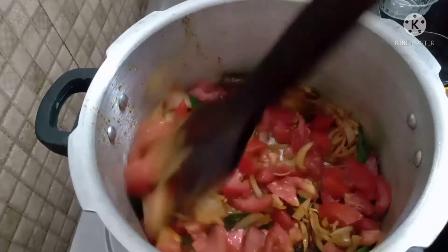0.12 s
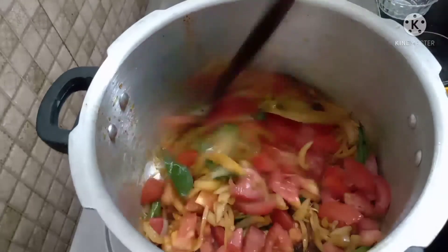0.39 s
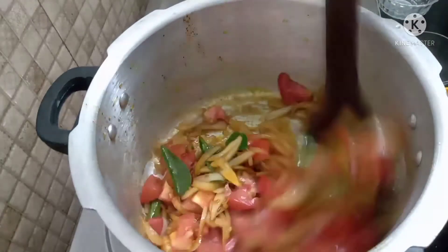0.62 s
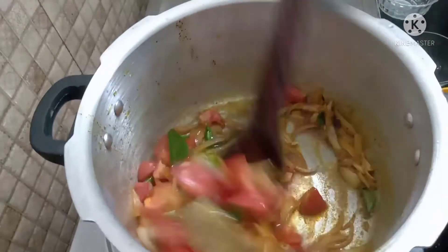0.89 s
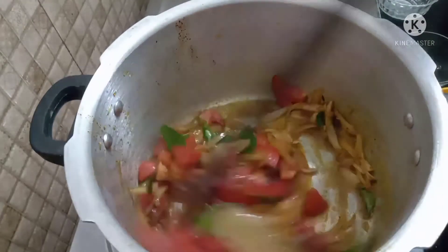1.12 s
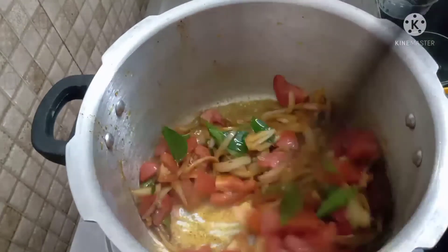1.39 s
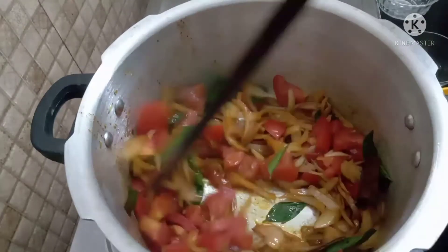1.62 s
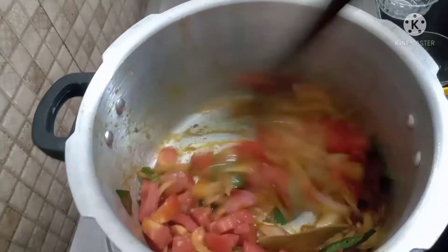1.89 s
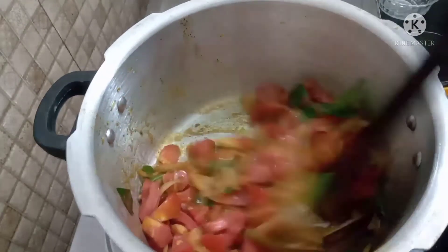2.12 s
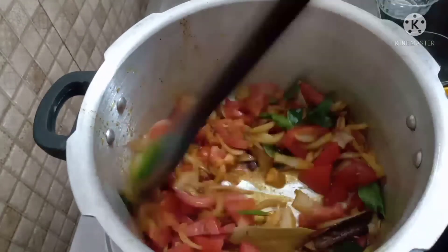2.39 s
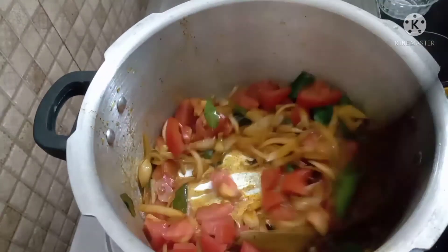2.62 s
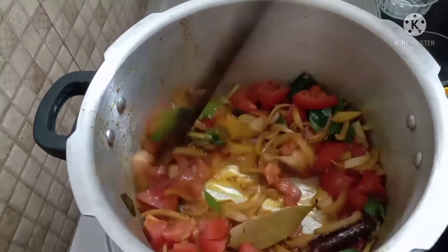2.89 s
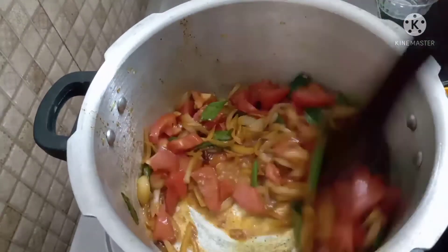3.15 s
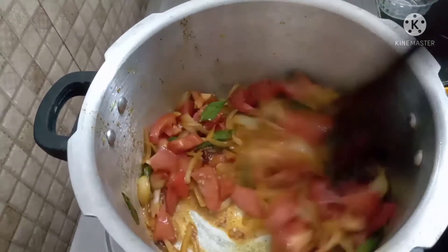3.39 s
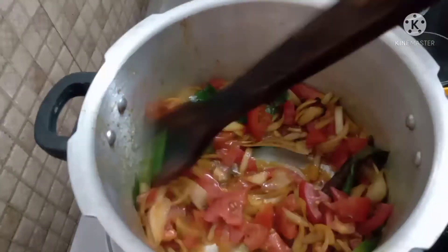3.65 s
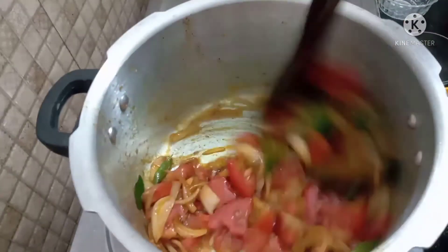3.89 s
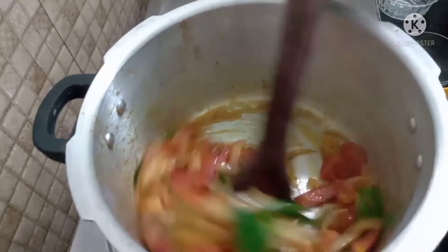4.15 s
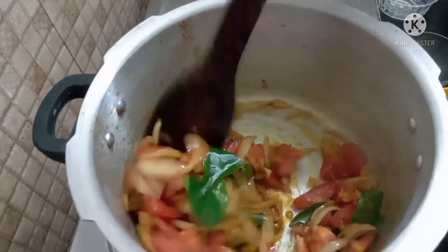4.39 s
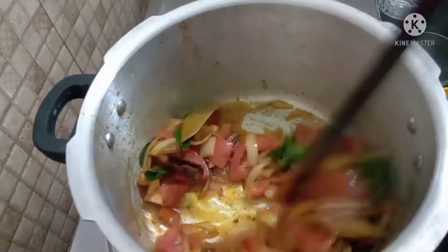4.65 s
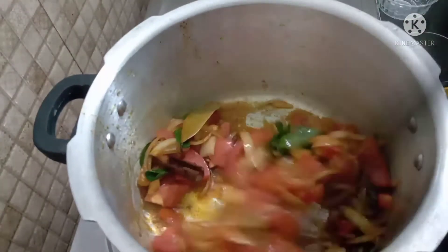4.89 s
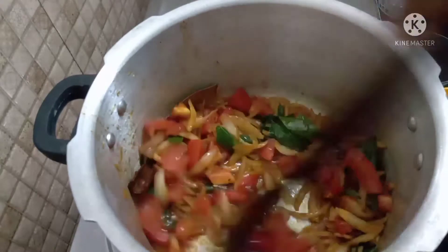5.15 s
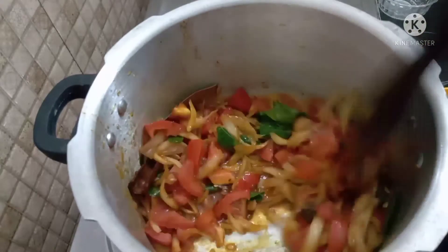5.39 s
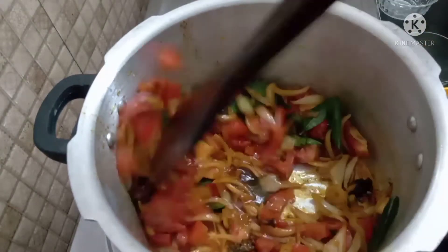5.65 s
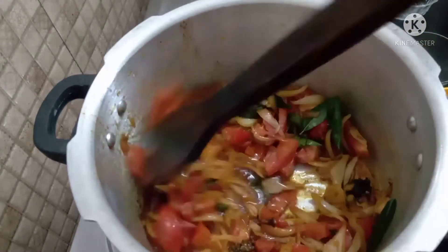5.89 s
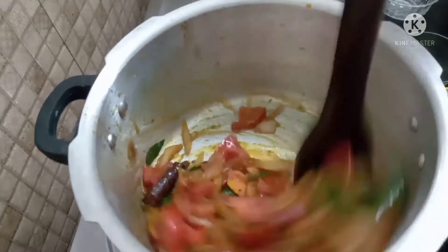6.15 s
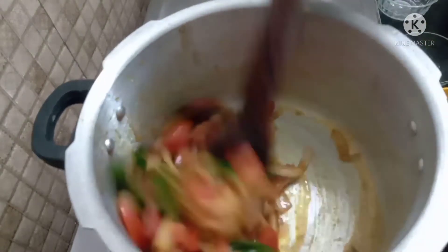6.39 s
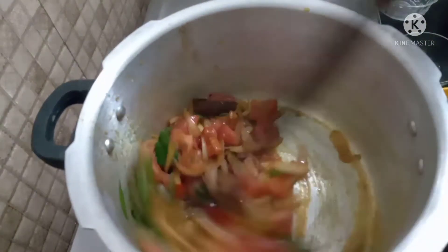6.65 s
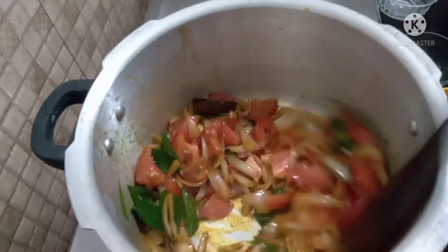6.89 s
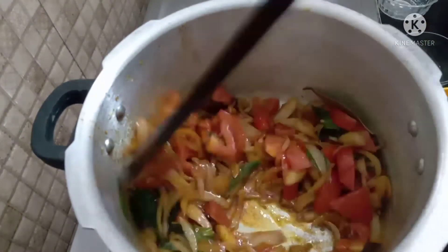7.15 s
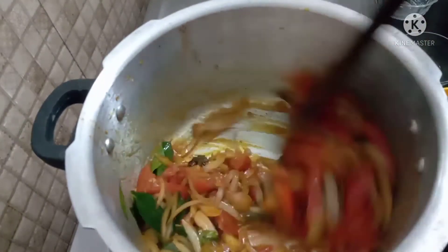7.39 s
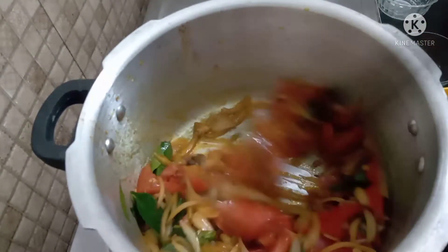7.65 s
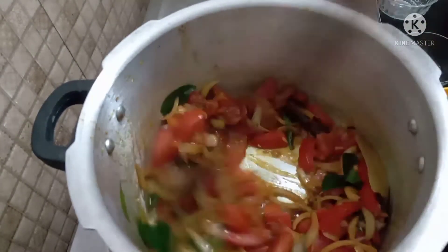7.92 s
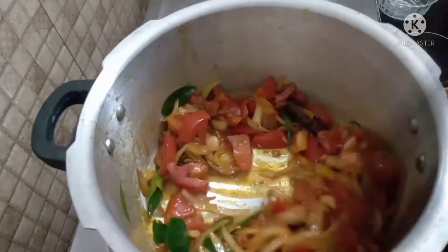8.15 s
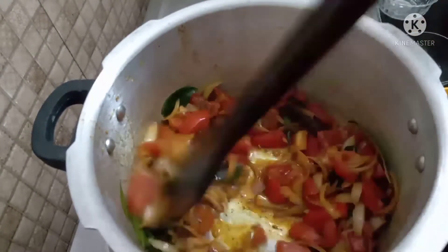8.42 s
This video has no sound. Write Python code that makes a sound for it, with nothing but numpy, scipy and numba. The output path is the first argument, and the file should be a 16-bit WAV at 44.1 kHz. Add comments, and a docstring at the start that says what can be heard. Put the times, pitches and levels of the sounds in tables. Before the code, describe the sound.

Chopped vegetables sizzle steadily in oil in a deep metal pot while a wooden spatula scrapes the base and knocks the wall.

```python
"""Vegetables frying in a deep pot

Chopped vegetables fry in oil in a deep metal pot, heard from above by a phone with one microphone.
Bursting steam is dense random impulses, coloured in bands; larger bubbles are short tones of rising pitch.
A wooden spatula scrapes the base and knocks the wall: noise and short pushes drive close, damped modes.
The phone's gain control ducks at each hard knock and creeps back over about a second.
"""
import sys
import numpy as np
from scipy import signal
from scipy.fft import rfft, irfft, next_fast_len
from scipy.io import wavfile
from scipy.ndimage import uniform_filter1d
from numba import njit

SR = 44100
rng = np.random.default_rng(int(sys.argv[2]) if len(sys.argv) > 2 else 0)


def log_audio(samples):
    """Write samples as a 16-bit WAV file to the path given in sys.argv[1]."""
    # one column per channel
    frames = np.atleast_2d(samples).T
    # limit to full scale, then quantise
    limited = np.clip(frames, -1, 1)
    pcm = np.round(limited * 32767).astype(np.int16)
    wavfile.write(sys.argv[1], SR, pcm)


def invert_db(x):
    """Field ratio 10**(x/20) for x, a level in decibels (scalar or array-like)."""
    u = np.asarray(x, float) / 20
    return 10 ** u


N = 376173  # length [samples]
BIGGEST = 5.0  # cap on the e-folds of rarity that a burst or bubble can reach


def unit(x):
    """Power normalisation: scale to rms 1."""
    return x / np.sqrt(np.mean(x ** 2))


def walk(rate):
    """Slow random modulation: levels held for 1 / rate seconds and slewed twice; rms 1."""
    held = int(SR / rate)
    steps = np.repeat(rng.standard_normal(N // held + 1), held)
    slewed = uniform_filter1d(uniform_filter1d(steps, held), held)
    return unit(slewed[:N])


def bells(rows, rest_db):
    """Gaussian envelopes: level in dB of events that swell and fade over a resting level."""
    t = np.arange(N) / SR
    swells = sum(invert_db(db) * np.exp(-((t - middle) / half) ** 2) for middle, half, db in rows)
    return 20 * np.log10(invert_db(rest_db) + swells)


def highpass(x, order, hz):
    """Butterworth filtering: remove what lies below hz."""
    return signal.sosfilt(signal.butter(order, hz, "high", fs=SR, output="sos"), x)


def colour(x, points, flicker_db, rate, count):
    """Spectral shaping: overlapping bands follow a curve, each flickering on its own."""
    hz, db = np.transpose(points)
    size = next_fast_len(N)
    pitch = np.log(np.arange(size // 2 + 1) * SR / size + 1)
    shaped = rfft(x, size) * invert_db(np.interp(pitch, np.log(hz), db, left=-90, right=-90))
    place = np.interp(pitch, np.log([hz[0], hz[-1]]), [0, count - 1])
    out = 0
    for k in range(count):
        band = irfft(shaped * np.clip(1 - abs(place - k), 0, 1), size)[:N]
        out = out + band * invert_db(flicker_db * walk(rate))
    return unit(out)


def crackle(scatter_db, throb_db, throb_rate):
    """Random impulse process: bursts so dense that they merge; sizes are uneven and come in throbs."""
    rarity = np.minimum(rng.exponential(size=N), BIGGEST)
    return rng.standard_normal(N) * invert_db(scatter_db * rarity + throb_db * walk(throb_rate))


def ring(push, modes):
    """Modal resonance: a force drives damped modes, one complex pole each."""
    out = 0
    for hz, db, t60 in modes:
        pole = np.exp((2j * np.pi * hz - np.log(1000) / t60) / SR)
        out = out + invert_db(db) * signal.lfilter([1], [1, -pole], push).imag
    return out


def decays(modes, after):
    """Free vibration: one exponentially fading sine per mode."""
    hz, db, t60 = np.transpose(modes)[:, :, None]
    return invert_db(db) * np.sin(2 * np.pi * hz * after) * invert_db(-60 * after / t60)


@njit
def grains(n, start, step, cycles, glide, size):
    """Bubble resonance: short damped tones whose pitch rises."""
    out = np.zeros(n)
    for k in range(len(start)):
        length = int(cycles[k] * 2 * np.pi / step[k])
        phase = 0.
        for i in range(min(3 * length, n - start[k])):
            phase += step[k] * (1 + glide * i / length)
            out[start[k] + i] += size[k] * np.sin(phase) * (i / length) * np.exp(-2 * i / length)
    return out


# level of the frying over time, as fine fizz and coarse sizzle swell and sink:
# (time [s], fine fizz [dB], coarse sizzle [dB])
FRY_LEVELS = [(0.0, -17.5, -21.5), (0.25, -18, -19.5), (0.6, -17, -21), (0.95, -18.5, -21),
              (1.3, -16.5, -20.5), (1.55, -22.5, -20.5), (1.95, -18.5, -22), (2.15, -19.5, -19),
              (2.58, -18.5, -20.5), (2.75, -22.5, -21), (3.15, -21.5, -22.5), (3.55, -22.5, -21),
              (3.75, -18, -23.5), (4.15, -19, -21.5), (4.43, -21.5, -21), (4.6, -20.5, -21),
              (4.75, -19.5, -21), (4.9, -19, -18), (5.35, -21, -18), (6.0, -17.5, -21),
              (6.75, -19.5, -19.5), (7.0, -22, -20.5), (7.35, -21.5, -23), (7.75, -21, -21.5),
              (8.02, -24, -22), (8.25, -19.5, -19.5), (8.53, -19.5, -19)]


def frying_levels():
    """Piecewise-linear envelopes: fizz and sizzle levels in dB, interpolated over time."""
    s, *columns = np.transpose(FRY_LEVELS)
    return [np.interp(np.arange(N) / SR, s, column) for column in columns]


def bubbles(count, low_hz, high_hz):
    """Bubble resonance: larger bubbles of tomato juice boiling in the oil."""
    when, pitch, life, size = rng.random((count, 4)).T
    start = (when * (N - 1)).astype(np.int64)
    hz = low_hz * (high_hz / low_hz) ** pitch
    cycles = 4 + 43.6 * life ** 3
    gain = invert_db(-2.0 * np.log(size + np.exp(-BIGGEST)))  # the rarer, the louder
    return unit(grains(N, start, 2 * np.pi * hz / SR, cycles, 0.035, gain))


# colour of the frying, below and on top: (frequency [Hz], relative density [dB per Hz])
COARSE_COLOUR = [(60, -52), (200, -36), (420, -6), (520, 0.5), (760, -3.5), (1100, -4), (1500, -2),
                 (2550, 3), (3900, 2), (5600, 2.5), (6600, 1.5), (7400, -5.5), (9000, -9)]
FINE_COLOUR = [(3500, -49), (5500, 0), (6600, 3), (7900, -4.5), (10000, 4.5), (12000, -1.5), (13700, -7.5),
               (14500, 4), (15500, 7), (15700, -18)]


def frying(fine_db, coarse_db):
    """Superposed steam bursts: fine fizz on top, coarse sizzle with bubbles below."""
    fine = colour(crackle(1.5, 1.0, 65.), FINE_COLOUR, flicker_db=0.75, rate=30., count=6)
    coarse = colour(crackle(2.7, 0.77, 45.), COARSE_COLOUR, flicker_db=0.79, rate=24., count=12)
    coarse = coarse + invert_db(-11.0) * bubbles(count=6000, low_hz=1674.0, high_hz=7335.0)
    return invert_db(fine_db) * fine + invert_db(coarse_db) * coarse


# swarms of like-sized bubbles where wet pieces land on bare metal:
# (middle [s], half length [s], centre frequency [Hz], relative level [dB])
SWARMS = [(.55, 0.086, 5500, -30), (1.32, 0.035, 5460, -26), (2.47, 0.046, 2970, -29),
          (2.57, 0.051, 5200, -22), (3.3, 0.12, 2520, -35), (5.49, 0.071, 2820, -28),
          (5.62, 0.057, 2800, -43), (5.78, 0.07, 2790, -26), (6.3, 0.082, 2950, -41),
          (7.19, .05, 3000, -28.5), (7.9, 0.13, 2990, -32), (8.49, 0.044, 2400, -32)]


def swarms(count):
    """Bubble resonance: like sizes share nearly one pitch, crowding round each swarm's middle."""
    middle, half, hz, db = np.repeat(SWARMS, count, axis=0).T
    when, pitch, size = rng.standard_normal((len(middle), 3)).T
    start = np.clip((middle + 0.84 * half * when) * SR, 0, N - 1).astype(np.int64)
    step = 2 * np.pi * hz * np.exp(0.17 * pitch) / SR
    # long swarms are sparser, so each bubble is stronger
    gain = invert_db(db + 11.0 + 3.6 * size) * np.sqrt(half / 0.043)
    return grains(N, start, step, np.full(len(middle), 14.0), 0.028, gain)


# air resonances in the pot: (frequency [Hz], relative drive [dB], t60 [s])
AIR_MODES = [(520, -1.5, 0.0096), (1120, 4.5, 0.11), (1188, 6.5, 0.061), (1231, 2.5, 0.075),
             (1316, 8, 0.023)]


def hum(coarse_db):
    """Cavity resonance: crackle drives the air in the deep pot, louder as the sizzle grows."""
    air = np.gradient(ring(crackle(1.5, 1.5, 18.), AIR_MODES))
    # -34.5 dB at a sizzle of -21 dB, and 1.5 dB more per dB of sizzle
    level_db = -34.5 + 1.5 * (coarse_db + 21)
    return unit(air) * invert_db(level_db - walk(2.05))


# brief dips of the sizzle: (middle [s], depth [dB])
DIPS = [(0.946, 4), (1.172, 2.5), (1.70, 3.5), (2.035, 7.5), (5.57, 4), (5.70, 2.5)]


def dip_gain():
    """Amplitude modulation: bell-shaped dips in dB, as a gain."""
    t = np.arange(N) / SR
    return invert_db(-sum(db * np.exp(-((t - middle) / 0.011) ** 2) for middle, db in DIPS))


LIFT_S = 0.035  # the blade damps the long ring until it leaves the wall


def jostling(count):
    """Variable damping: sliding food grips and frees the wall, roughening and lowering its ring."""
    after = np.arange(SR) / SR
    share, held = 0.7, int(0.009 * SR)
    rough = np.repeat(rng.standard_normal((count, SR // held + 1)), held, axis=1)[:, :SR]
    rough = uniform_filter1d(rough, held, axis=1) * (1 - np.exp(-after / LIFT_S))
    return (1 + share / (1 - share) * rough) / (1 + np.minimum(after / LIFT_S, 1))


# spatula blows: (time [s], body [dB], low wall [dB], upper wall [dB], bright ring [dB], long ring [dB]),
# the last four relative to the body
KNOCKS = [(0.1167, -28.5, -46, -5, 4, -18), (0.961, -27.5, -1.5, 2, 8.5, -7),
          (1.3746, 3, -31, -11, -6, -16), (1.6973, -47.5, 14.5, -14, 6, -4),
          (2.0466, 3.5, -40, -13, -1, -14.5), (2.409, -34, -1, -5, 1, -2), (2.6395, 0.5, -26, -19, -9, -20),
          (2.895, -22, -30, -24, -10, -14), (3.4989, -31, -22, -6, 16, -3), (4.3797, -26, -17, -4, 3, -6),
          (4.442, 6.5, -32, -30, -9, -16), (4.7086, -30, -1, 6.5, 11, -2),
          (4.7791, -2.5, -31, -11, -3.5, -9.5), (4.993, -27.5, -27, -3, 12, -17),
          (5.0883, -10, -23, -12, 3, -11), (5.3415, -23, -5, -15, 1, -24), (5.6745, -32, -34, 2.5, 6, -1),
          (6.553, -20, -27, -22, -6, -12), (6.813, -22.5, -36, 6, 10.5, -11),
          (6.8589, 8.5, -27, -14.5, -8, -26), (7.071, -26.5, -17, -20, 4.5, -4),
          (7.4276, -33.5, 3, 4, 14, -2), (7.573, -38.5, -3, 14.5, -1, -12),
          (7.7176, -30, -6, -22, -26, -12), (8.1102, -38, -22, 3, 9, -8), (8.172, -44, 14, 4, 2, -8),
          (8.1955, -1, -19.5, -22, -22, -17.5)]
# pot modes, in the order of those levels: (frequency [Hz], relative level [dB], free t60 [s])
BODY = [(688, 0, .034), (880, -9, .022)]
WALL_LOW = [(254.8, 0.5, 0.5), (218, -7, 0.066), (310, -4.5, 0.046)]
WALL = [(322.9, 3, 0.42), (349.8, 1.5, 0.27), (356.3, -13.5, 0.43), (397, -9, 0.36), (452, -5, 0.31)]
BRIGHT = [(965, 13, 0.014), (1404, 7.5, 0.1), (1042, 1.5, 0.17), (1114, -4, 0.23), (1144, -6, 0.068),
          (1170, -13, 0.37), (1380, -16, 0.35)]
RING = [(506, -12, 0.3), (544, -8, 0.4), (575, -9, .4), (630, -5, 0.35), (667, -5, .3), (690, -2, 0.36),
        (725, -5, 0.3), (789, -4, 0.25), (861, -7, 0.25), (926, -10, 0.25), (975, -11, .22)]


def knocks():
    """Impact excitation of modes: hard blows are one short push; light ones glance off and rattle."""
    s, body_db, *shares = np.transpose(KNOCKS)
    after = np.arange(SR) / SR
    push = -np.hanning(int(0.001 * SR) + 2)
    rattle_s = np.arange(1300) / SR
    rattles = rng.standard_normal((len(s), len(rattle_s))) * np.exp(-rattle_s / 0.0074) * invert_db(-15.5)
    rattles[body_db > -12] *= invert_db(-22)  # hard blows hardly rattle
    rattles[:, 0] = 1
    blows = 0
    for modes, share_db in zip((BODY, WALL_LOW, WALL, BRIGHT, RING), (0, *shares)):
        # sound follows the speed of the wall, not its deflection
        deflection = signal.fftconvolve(decays(modes, after), [push])[:, :SR]
        speed = np.gradient(deflection, axis=1)
        if modes is RING:
            speed = speed * (1 - np.exp(-(after / LIFT_S) ** 2))
        # each blow lands elsewhere and weights the modes anew, by 2.5 dB, except in the body
        spot = invert_db((modes is not BODY) * 2.5 * rng.standard_normal((len(s), len(modes))))
        weights = invert_db(body_db + share_db)[:, None] * spot
        part = weights @ speed / np.abs(speed.sum(axis=0)).max()
        if modes in (RING, BRIGHT, WALL):
            part = part * jostling(len(s))
        blows = blows + part
    out = np.zeros(N + 2 * SR)
    for start, blow in zip((s * SR).astype(int), signal.fftconvolve(blows, rattles, axes=1)):
        out[start:start + len(blow)] += blow
    # the pot is small against long waves and radiates little bass
    return highpass(out[:N], 6, 225.)


# dry ticks of the blade edge on the metal: (time [s], level [dB], tilt [dB per octave])
TICKS = [(1.626, -20, 0), (3.5, -12, 2), (3.506, -22.5, 5), (3.555, -23, 4), (4.709, -12.5, 0),
         (5.0896, -28, 7), (5.343, -25, 4), (5.664, -24, 1), (5.675, -11, -5), (7.071, -16, 2),
         (7.7184, -20, 10), (8.1097, -14, 6)]
# modes of the wooden blade: (frequency [Hz], relative level [dB], t60 [s])
BLADE = [(560, -9, .02), (1000, 0, .014), (1400, -2, .014), (1750, -2, .02), (2350, -4, .014),
         (2850, -2, .02), (3700, -6, .018)]


def ticks():
    """Impact excitation: short blade modes, tilted by the angle of contact, skidding for a moment."""
    out, after = np.zeros(N), np.arange(3000) / SR
    blade = decays(BLADE, after)
    octaves = np.log2(np.transpose(BLADE)[0] / 1500)
    skids = rng.standard_normal((len(TICKS), len(after))) * np.exp(-after / 0.004) * invert_db(-22.5)
    skids[:, 0] = 1
    for (s, db, tilt_db), skid in zip(TICKS, skids):
        tick = np.convolve(invert_db(db + tilt_db * octaves) @ blade, skid)[:len(after)]
        out[int(s * SR):int(s * SR) + len(after)] += tick
    return highpass(out, 4, 400.)


# scraping strokes of the blade over the base: (middle [s], half length [s], drive [dB])
STROKES = [(0.44, 0.2, -46.5), (0.97, 0.13, -42), (1.605, 0.17, -41), (2.12, 0.062, -26),
           (2.36, 0.096, -32), (2.88, 0.067, -39), (3.677, 0.085, -39.5), (4.0, 0.036, -43),
           (4.49, 0.036, -33.5), (4.953, 0.25, -38.5), (5.47, 0.13, -35), (6.096, 0.43, -45.5),
           (6.62, 0.062, -47), (7.054, 0.24, -37.5), (7.57, 0.14, -44.5), (7.877, 0.13, -42),
           (8.238, 0.047, -29), (8.5, 0.099, -36)]


def drag():
    """Friction excitation: the blade chatters over the base and shakes the pot modes."""
    drive = invert_db(bells(STROKES, rest_db=-52.5))  # the blade still stirs between strokes
    chatter = crackle(2.0, 2.8, 30.)
    wall, body = (ring(chatter * drive, modes) / np.std(ring(chatter[:SR], modes))
                  for modes in ([*WALL_LOW, *WALL], [*BODY, *RING]))
    return highpass(wall + invert_db(1.5) * body, 6, 220.)


# bright snaps of the blade tip and of drops bursting in the oil:
# (time [s], level [dB], frequency [Hz], fade to 1/e [s])
POPS = [(3.525, -16, 1900, 0.0066), (3.549, -19, 2500, 0.017), (3.598, -18, 3200, .012),
        (4.999, -17, 1700, 0.0091), (5.548, -8, 6040, 0.003)]


def pops():
    """Transient noise: a crack in a band around the snap's pitch, fading exponentially."""
    out, after = np.zeros(N), np.arange(1500) / SR
    for s, db, hz, fade in POPS:
        band = signal.butter(2, [0.83 * hz, 1.4 * hz], "band", fs=SR)
        crack = unit(signal.lfilter(*band, rng.standard_normal(len(after))))
        out[int(s * SR):int(s * SR) + len(after)] += invert_db(db) * crack * np.exp(-after / fade)
    return out


def kitchen(x):
    """Reverberation: tiles and cupboards send back a dense, dull tail that builds within 5 ms."""
    after = np.arange(SR // 2) / SR
    tail = rng.standard_normal(len(after)) * invert_db(-60 * after / 0.5) * np.clip(after / 0.0048, 0, 1) ** 2
    tail = signal.sosfilt(signal.butter(2, [380., 1500.], "band", fs=SR, output="sos"), tail)
    return x + invert_db(-20.5) * signal.fftconvolve(x, tail / np.linalg.norm(tail))[:N]


# colour of the low rumble: (frequency [Hz], relative density [dB per Hz])
RUMBLE_COLOUR = [(25, 20.7), (75, 5.1), (103, 9.3), (160, 4.6), (230, 1)]
# low rumble and short low thumps, some at the hard knocks: (middle [s], half length [s], level [dB])
RUMBLE = [(.52, 0.064, -48), (1.376, .012, -40), (1.8, 0.25, -45), (2.047, 0.0086, -26), (2.15, 0.1, -37),
          (2.42, 0.087, -46), (2.641, 0.011, -28), (4.443, .012, -44), (5.0, .03, -49), (5.46, 0.083, -39),
          (6.55, .03, -47), (6.86, 0.015, -35), (7.6, 0.11, -47), (7.8, .06, -52), (8.24, 0.082, -38),
          (8.52, 0.017, -46)]


def low_rumble():
    """Filtered noise under swelling envelopes: a low rumble with short low thumps."""
    rumble = colour(rng.standard_normal(N), RUMBLE_COLOUR, flicker_db=2.7, rate=11.0, count=4)
    return rumble * invert_db(bells(RUMBLE, rest_db=-51.5))


def scene():
    """Superposition: all sources reach one microphone, copied to both channels."""
    fine_db, coarse_db = frying_levels()
    fry = frying(fine_db, coarse_db) + swarms(count=120) + hum(coarse_db)
    spatula = kitchen(knocks() + ticks()) + drag()
    mix = fry * dip_gain() + spatula + pops() + low_rumble()
    return np.tile(mix, (2, 1))


@njit
def gain_control(x, top, hold, attack, release):
    """Dynamic compression: gain falls fast when the held peak passes the ceiling, then creeps to 1."""
    gain, g, peak = np.empty(len(x)), 1., 1e-9
    for i in range(len(x)):
        peak = max(abs(x[i]), peak * (1 - hold))
        want = min(1., top / peak)
        g += (want - g) * attack if want < g else (1 - g) * release
        gain[i] = g
    return gain


def low_pass(x):
    """Removes everything above the highest recorded frequency."""
    return signal.sosfilt(signal.butter(12, 15520, fs=SR, output="sos"), x)


def record(dry):
    """Compression and soft saturation: a slow and a quick gain control, rounded peaks, a bass cut."""
    # the detector hears little treble, so lone clicks barely move the gain
    heard = signal.sosfilt(signal.butter(1, 3000., fs=SR, output="sos"), dry[0])
    hold = attack = 1 / (0.004 * SR)
    slow = gain_control(heard, 0.26, hold, attack, 1 / (0.9 * SR))
    quick = gain_control(heard, 0.65, hold, attack, 1 / (0.011 * SR))
    x = dry * slow * quick
    knee, room = 0.45, 0.2  # amplitude where rounding starts, and the room left above it
    over = np.maximum(abs(x) - knee, 0)
    x = np.sign(x) * (np.minimum(abs(x), knee) + room * np.tanh(over / room))
    return low_pass(highpass(x, 2, 120.))


dry = scene()
out = record(dry)
log_audio(out)
```